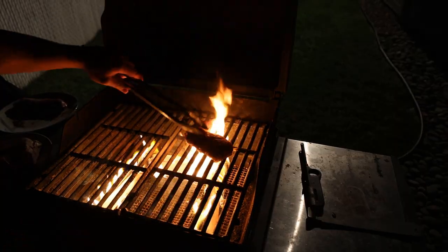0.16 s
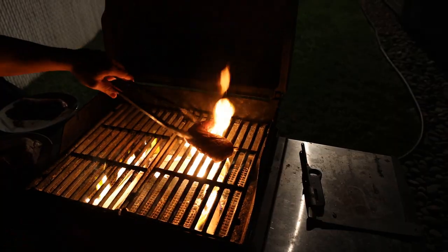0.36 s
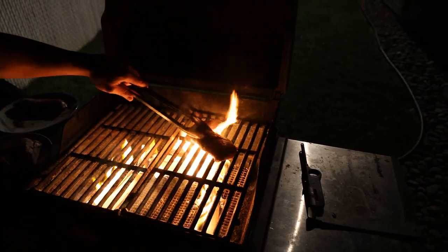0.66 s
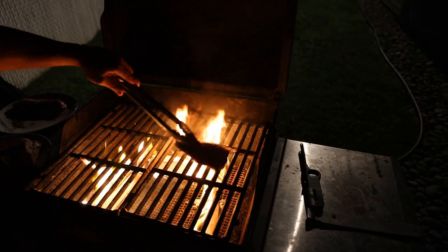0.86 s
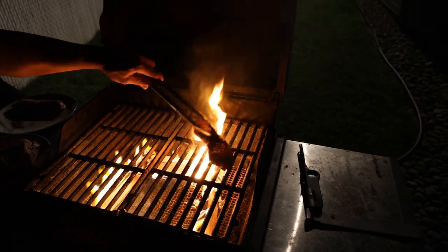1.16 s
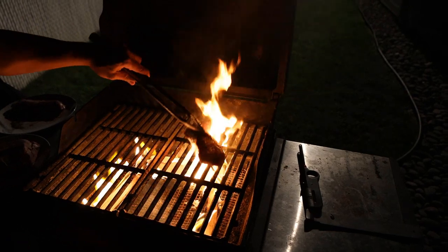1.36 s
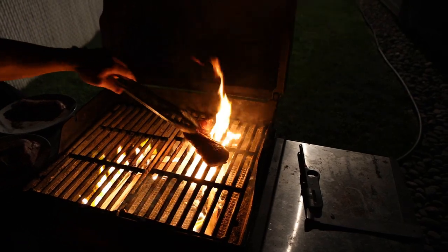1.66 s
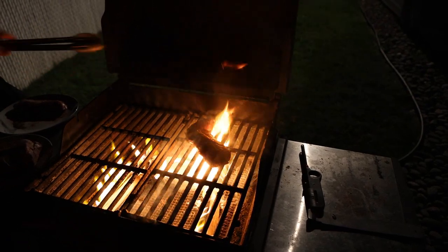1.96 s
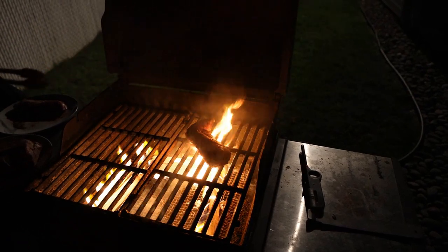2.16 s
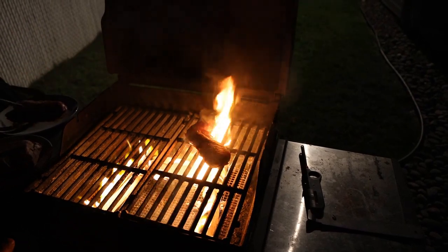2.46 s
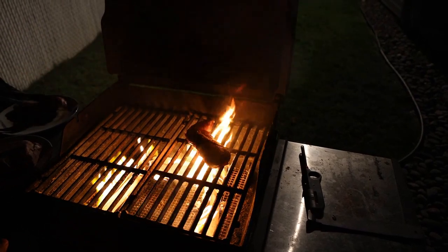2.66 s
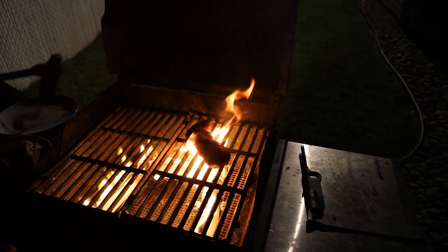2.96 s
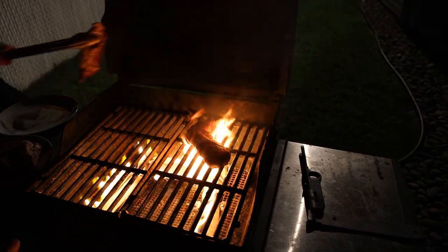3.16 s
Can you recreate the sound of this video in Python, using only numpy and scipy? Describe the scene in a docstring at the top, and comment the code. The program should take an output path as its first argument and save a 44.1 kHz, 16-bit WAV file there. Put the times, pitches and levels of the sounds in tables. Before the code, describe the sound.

Meat starts sizzling on a grill, with one loud pop and metal tong knocks.

```python
"""A fire roars softly in a metal grill box while insects trill far off in the night.
Raw meat lands on the grate, scrapes over the bars and starts to sizzle: dense tiny steam bursts
make a bright hiss and a duller frying. Fat spits several times and later pops once, loudly.
The tongs touch metal lightly as the meat goes on and knock twice after the pop. One microphone."""
import sys
import numpy as np
from scipy import signal
from scipy.fft import rfft, irfft
from scipy.io import wavfile

SR = 44100
rng = np.random.default_rng(int(sys.argv[2]) if len(sys.argv) > 2 else 0)


def master_out(mix):
    """Clip the mix to full scale and print it as 16-bit PCM to the path in sys.argv[1]."""
    frames = np.transpose(np.atleast_2d(mix))
    ceiling = np.clip(frames, -1, 1)
    pcm = np.round(ceiling * 32767).astype(np.int16)
    wavfile.write(sys.argv[1], SR, pcm)


N = 145530


def amp(db):
    """dB to gain."""
    return 10 ** (np.asarray(db) / 20)


def unit_rms(x):
    """Scale to rms 1."""
    return x / np.sqrt(np.mean(x ** 2) + 1e-20)


def noise():
    """White noise."""
    return rng.standard_normal(N)


def envelopes(rows):
    """One gain curve per dB column; the first column is time in seconds."""
    times_s, *columns_db = np.transpose(rows)
    return [amp(np.interp(np.arange(N) / SR, times_s, db)) for db in columns_db]


def flicker(spread_db, rate_hz):
    """Smooth random gain around 0 dB."""
    hop, settle = 40, 2000
    pole = np.exp(-2 * np.pi * rate_hz * hop / SR)
    steps = rng.standard_normal(N // hop + settle + 2)
    slow = unit_rms(signal.lfilter([1], [1, -2 * pole, pole * pole], steps)[settle:])
    return amp(spread_db * np.interp(np.arange(N) / hop, np.arange(len(slow)), slow))


def butter(x, order, hz, kind):
    """Butterworth filter."""
    return signal.sosfilt(signal.butter(order, hz, kind, fs=SR, output="sos"), x)


def resonance(x, hz, *widths_hz):
    """Unity-gain resonators in series, one per width."""
    for width_hz in widths_hz:
        r, w = np.exp(-np.pi * width_hz / SR), 2 * np.pi * hz / SR
        x = signal.lfilter(np.array([1, 0, -1]) * (1 - r * r) / 2, [1, -2 * r * np.cos(w), r * r], x)
    return x


def coloured(source, spectrum, flicker_db, rate_hz, top_hz=15750, skirt_db_per_oct=43):
    """Shape a source to a spectrum; third-octave bands flicker independently; rms 1."""
    hz = np.maximum(np.fft.rfftfreq(N, 1 / SR), 1)
    points_hz, points_db = np.transpose(spectrum)
    octaves = np.log2(hz / points_hz[0])
    span_oct = np.log2(points_hz[-1] / points_hz[0])
    outside_oct = np.maximum(-octaves, 0) + np.maximum(octaves - span_oct, 0)
    shape_db = np.interp(np.log(hz), np.log(points_hz), points_db) - skirt_db_per_oct * outside_oct
    shaped = rfft(source) * amp(shape_db) * (hz < top_hz)
    thirds = 3 * np.maximum(octaves, 0)
    out = 0
    for k in range(int(3 * span_oct) + 5):
        band = irfft(shaped * np.clip(1 - abs(thirds - k), 0, 1), N)
        out += band * flicker(flicker_db, rate_hz)
    return unit_rms(out)


def clicks(times_s, db):
    """Impulses at given times and levels."""
    out = np.zeros(N)
    out[(times_s * SR).astype(int)] = amp(db)
    return out


def ring(hits, hz, t60_s):
    """A unit impulse starts a decaying sine of height 1."""
    r, w = np.exp(-np.log(1000) / (t60_s * SR)), 2 * np.pi * hz / SR
    return signal.lfilter([0, np.sin(w)], [1, -2 * r * np.cos(w), r * r], hits + 1e-18)


def dying_noise(hits, t60_s):
    """Noise that starts at each impulse and decays."""
    r = np.exp(-np.log(1000) / (t60_s * SR))
    return signal.lfilter([1], [1, -r], hits + 1e-18) * noise()


def strike(times_s, db, tilt_db_per_oct, modes, spread_db):
    """Each blow rings all modes, tilted about the lowest, with random strengths."""
    out = 0
    for hz, mode_db, t60_s in modes:
        tilt_db = tilt_db_per_oct * np.log2(hz / modes[0][0])
        chance_db = rng.normal(0, spread_db, len(times_s))
        out += ring(clicks(times_s, db + mode_db + tilt_db + chance_db), hz, t60_s)
    return out


# Roar spectrum. Each row: frequency in Hz, relative density in dB.
ROAR_SPECTRUM = [(15, -24), (25, -0.5), (129, -4), (171, -0.5), (345, -3.5), (381, -5), (505, -14.5),
                 (681, -2), (939, -10), (1170, -13), (3000, -33.5), (3900, -72), (6600, -120)]
# Fire envelope. Each row: time in seconds, level in dB.
FIRE_ENVELOPE = [(0.0, -50.5), (0.41, -48), (0.96, -49.5), (1.22, -47.5), (1.6, -50), (2.23, -48),
                 (2.8, -48.5), (3.3, -47)]


def fire(box_hz=707, box_width_hz=54, box_db=-9):
    """Flames make a low, lumpy roar; the metal box resonates."""
    roar = coloured(noise(), ROAR_SPECTRUM, flicker_db=0.93, rate_hz=6)
    box = unit_rms(resonance(noise(), box_hz, box_width_hz, 3 * box_width_hz))
    box *= amp(box_db) * flicker(spread_db=1, rate_hz=18)
    return envelopes(FIRE_ENVELOPE)[0] * (roar + box)


# Chorus envelope. Each row: time in seconds, level in dB.
INSECT_ENVELOPE = [(0, -57.5), (.05, -59), (.09, -62.5), (.3, -62), (.6, -67), (1.3, -62), (2.0, -64.5),
                   (2.6, -61), (3.3, -64.5)]


def insects(hz=3896, width_hz=325, overtone_db=-19.5):
    """A far chorus throbs in one narrow band, with a weak octave above."""
    band = resonance(noise(), hz, width_hz, width_hz)
    overtone = amp(overtone_db) * resonance(noise(), 2 * hz, width_hz, width_hz)
    chorus = unit_rms((band + overtone) * flicker(spread_db=1, rate_hz=38))
    return envelopes(INSECT_ENVELOPE)[0] * chorus


# Background spectrum. Each row: frequency in Hz, relative density in dB.
AIR_SPECTRUM = [(2500, 12), (5000, 2), (8000, -8.5), (11500, -8), (15000, -11)]


def night_air(level_db=-71.5):
    """Faint, bright background hiss."""
    return amp(level_db) * coloured(noise(), AIR_SPECTRUM, flicker_db=0.8, rate_hz=8)


# Spits, then the loud pop. Each row: start in seconds, level in dB, relative spray level in dB.
FAT_SPITS = [(.1205, -49, -1), (.1625, -36, -11.5), (.205, -47, -6), (0.2402, -29, -8), (0.3104, -27, -15),
             (.405, -44, -8), (.449, -40, -17), (.545, -44, -4), (.91, -43, -17), (1.27, -42, -12),
             (2.423, -5.5, -15.5)]
# Ring of a spit. Each row: frequency in Hz, gain in dB, T60 in seconds.
SPIT_MODES = [(1900, -22, .005), (4100, -14, .002), (7500, -12, .001), (10800, -1, .0015), (14700, 1, .002)]


def spits(spray_t60_s=0.02):
    """Fat pops: a click that rings briefly, with a short spray."""
    times_s, db, spray_db = np.transpose(FAT_SPITS)
    pops = 0
    for k, (hz, mode_db, t60_s) in enumerate(SPIT_MODES):
        pops += (-1) ** k * ring(clicks(times_s, db + mode_db), hz, t60_s)
    spray = dying_noise(clicks(times_s, db + spray_db), spray_t60_s)
    return butter(pops, 2, 1500, "high") + butter(spray, 1, 6000, "high")


def steam_bursts(per_s=9000, spread_db=1.5):
    """Tiny steam bursts: dense random impulses of uneven size."""
    born = rng.random(N) < per_s / SR
    size_db = spread_db * np.minimum(rng.exponential(1, N), 5)
    return born * amp(size_db) * rng.choice([-1, 1], N)


# Sizzle vigour. Each row: time in seconds, hiss level in dB, frying level in dB.
SIZZLE_ENVELOPES = [(.15, -67.5, -78), (.24, -56, -65), (.27, -47, -64), (.31, -40, -62), (.36, -43, -68),
                    (.42, -40, -59), (.56, -42, -68), (.72, -42, -59.5), (.85, -42.5, -62),
                    (.91, -37.5, -60), (1.0, -45, -61.5), (1.18, -40.5, -59), (1.35, -36.5, -53.5),
                    (1.5, -38.5, -57.5), (1.69, -35, -55.5), (1.85, -38, -59), (2.04, -40.5, -62),
                    (2.34, -38.5, -61), (2.76, -40, -59), (2.95, -40.5, -61.5), (3.04, -40.5, -59),
                    (3.14, -42.5, -73), (3.3, -44, -59.5)]
# Hiss and frying spectra. Each row: frequency in Hz, relative density in dB.
HISS_SPECTRUM = [(2500, -36), (4300, -17), (5100, -19), (6500, -13), (7300, -13), (9000, -8), (10200, -6.5),
                 (12000, -3), (14200, 1), (15200, -0.5), (15700, 3)]
FRY_SPECTRUM = [(900, -11), (1400, -4), (2200, 0), (3400, 1.5), (5000, -12.5), (7500, -5.5)]
# Resonant band added to the hiss. Each row: time in seconds, gain in dB.
BODY_ENVELOPE = [(.2, -5), (.4, -7.5), (.7, -2), (.85, -8), (1.1, -16), (1.35, -9), (1.7, -8), (2.0, -8),
                 (2.3, -10.5), (2.7, 0.5), (3.0, -7), (3.3, -5.5)]


def sizzle(body_hz=10300, body_width_hz=2200):
    """Steam bursts make a bright hiss of shifting colour and a duller frying."""
    hiss_gain, fry_gain = envelopes(SIZZLE_ENVELOPES)
    hiss = coloured(steam_bursts(), HISS_SPECTRUM, flicker_db=1.04, rate_hz=4.6)
    body = envelopes(BODY_ENVELOPE)[0] * resonance(hiss, body_hz, body_width_hz)
    fry = coloured(steam_bursts(), FRY_SPECTRUM, flicker_db=1.15, rate_hz=36)
    return hiss_gain * (hiss + body) + fry_gain * fry


# Drag of the meat. Each row: time in seconds, level in dB.
SCRAPE_ENVELOPE = [(.2, -83), (.24, -62), (.31, -53), (.38, -60), (.45, -69), (.55, -87)]


def scrape(band_hz=(450, 1440)):
    """Meat dragged onto the bars rubs unevenly."""
    rub = butter(noise(), 2, band_hz, "band") * flicker(spread_db=3.2, rate_hz=44)
    return envelopes(SCRAPE_ENVELOPE)[0] * unit_rms(rub)


# Meat lands, tongs are put down. Each row: start in seconds, level in dB, tilt in dB per octave.
GRATE_BUMPS = [(.25, -39, -2), (.298, -35.5, -3), (.325, -47, 0), (2.662, -43.5, 0.5), (2.688, -44.5, 1),
               (2.72, -46.5, 2.5)]
# Grate and box modes. Each row: frequency in Hz, gain in dB, T60 in seconds.
GRATE_MODES = [(113, -2.5, 0.1), (408, -5.5, 0.064), (488, -4.5, 0.079), (633, -1.5, 0.13),
               (693, -7.5, 0.11), (1066, -7.5, 0.047), (1376, -10.5, 0.16)]


def bumps(band_hz=(80, 1800)):
    """Soft contacts ring the low modes of the grate and box."""
    times_s, db, tilt_db_per_oct = np.transpose(GRATE_BUMPS)
    thuds = strike(times_s, db, tilt_db_per_oct, GRATE_MODES, spread_db=3.5)
    return butter(thuds, 2, band_hz, "band")


# Touches and knocks. Each row: start in seconds, level in dB, tilt in dB per octave, tick level in dB.
TONG_KNOCKS = [(0.258, -64, 4.5, -44), (0.306, -53, 6, -34), (0.374, -59, 7, -35), (0.389, -57, 7, -32),
               (.448, -69, 8, -34), (0.459, -57, 3.5, -32.5), (2.6589, -18.5, 1.5, -20),
               (2.673, -20.5, -2.5, -23), (2.684, -32, 3, -37)]
# Struck metal modes. Each row: frequency in Hz, gain in dB, T60 in seconds.
METAL_MODES = [(1040, -28, 0.03), (1240, -29, 0.03), (1306, -14, 0.12), (1392.5, -0.5, 0.1),
               (1540, -10, .05), (1667, -12, 0.04), (1765, 2, 0.034), (1940, -8.5, 0.041),
               (2230, -4.5, 0.052), (2356, -11.5, 0.078), (2702, -16, 0.032), (3957, -11, 0.055),
               (5100, -18.5, .045), (5686, -15, 0.038)]


def tongs(crack_db=-4.5, low_cut_hz=1020):
    """Tongs hit metal: ringing modes, a crisp tick and a rattling crack; no bass."""
    times_s, db, tilt_db_per_oct, tick_db = np.transpose(TONG_KNOCKS)
    crack = dying_noise(clicks(times_s, db + crack_db), t60_s=0.057)
    tick = dying_noise(clicks(times_s, tick_db), t60_s=0.0067)
    tick = butter(tick, 2, 2500, "high")
    rattle = butter(crack + tick, 2, 5600, "low")
    metal = strike(times_s, db, tilt_db_per_oct, METAL_MODES, spread_db=1.2)
    low_cut = signal.ellip(5, 1, 40, low_cut_hz, "high", fs=SR, output="sos")
    return signal.sosfilt(low_cut, metal + rattle)


def scene():
    """All sources, the same in both channels."""
    mono = fire() + insects() + night_air() + spits() + sizzle() + scrape() + bumps() + tongs()
    return np.array([mono, mono])


def record(dry):
    """Steep zero-phase low-pass."""
    cutoff_hz = 16700
    return signal.sosfiltfilt(signal.ellip(10, 0.2, 45, cutoff_hz, fs=SR, output="sos"), dry)


dry = scene()
out = record(dry)
master_out(out)
```